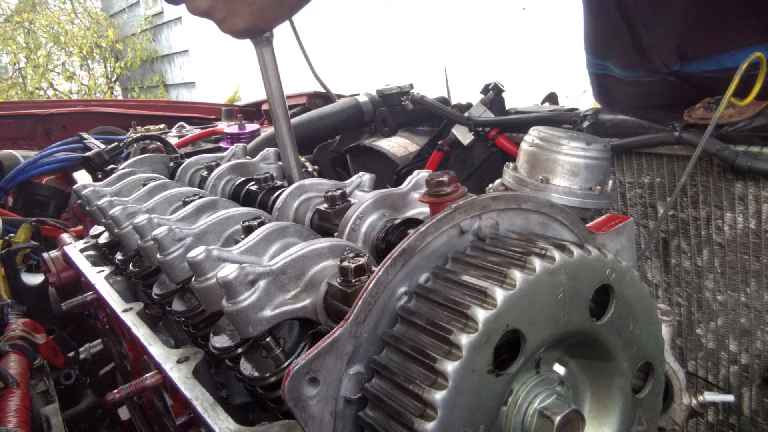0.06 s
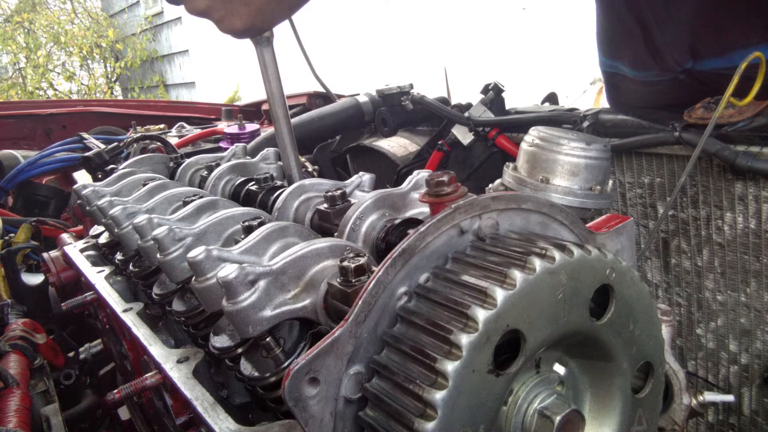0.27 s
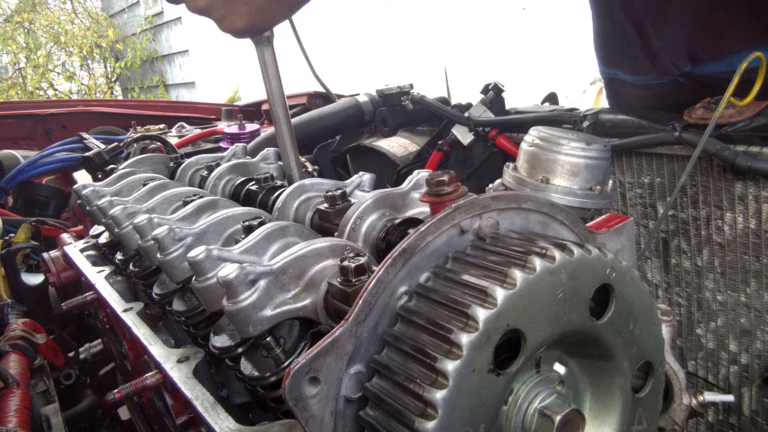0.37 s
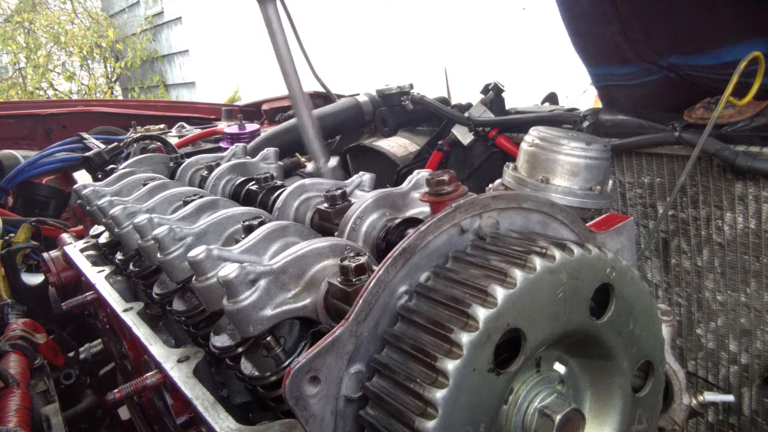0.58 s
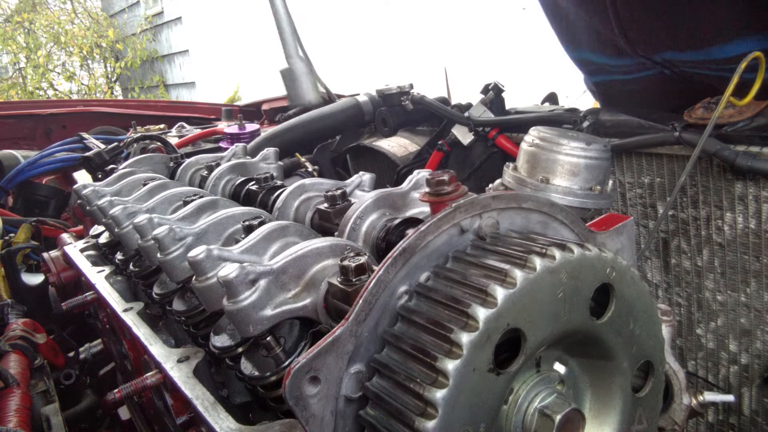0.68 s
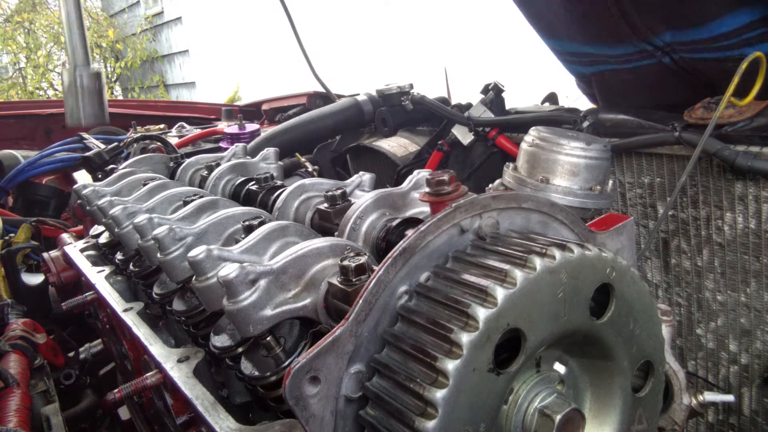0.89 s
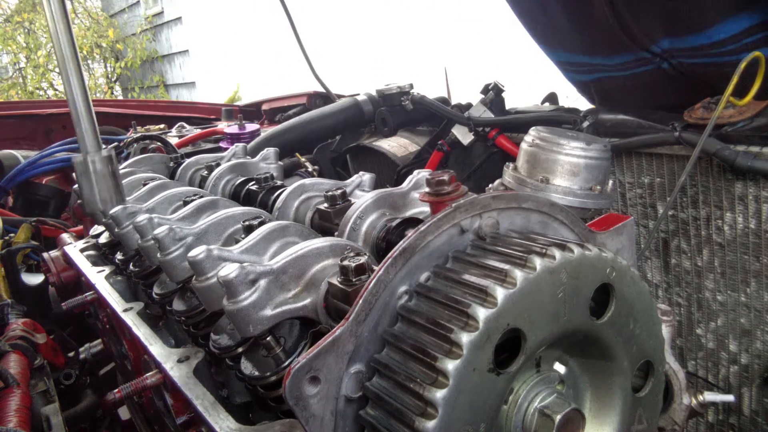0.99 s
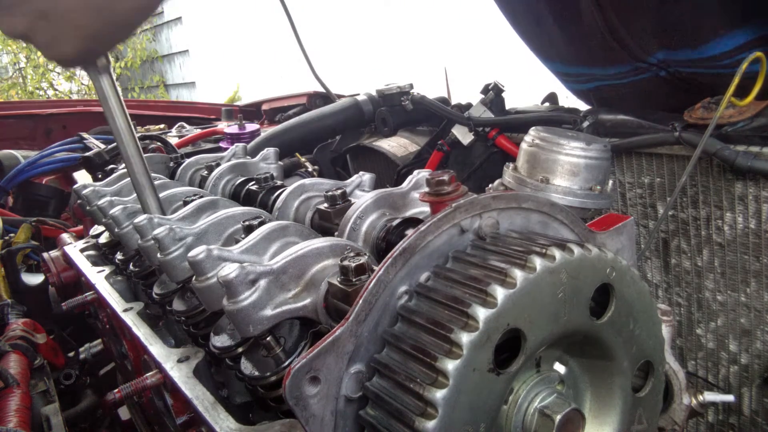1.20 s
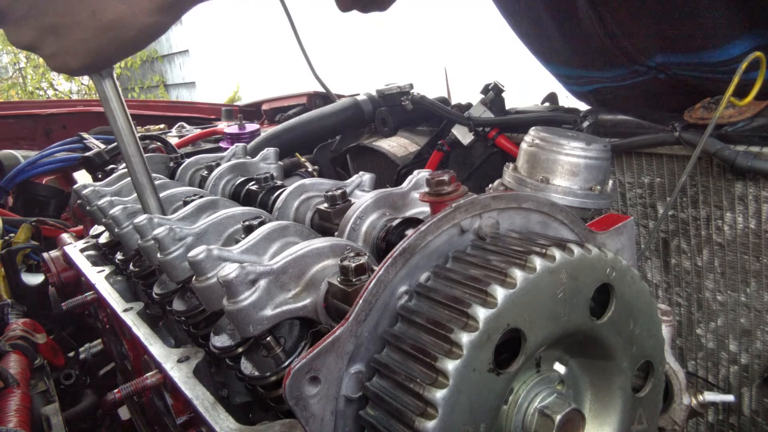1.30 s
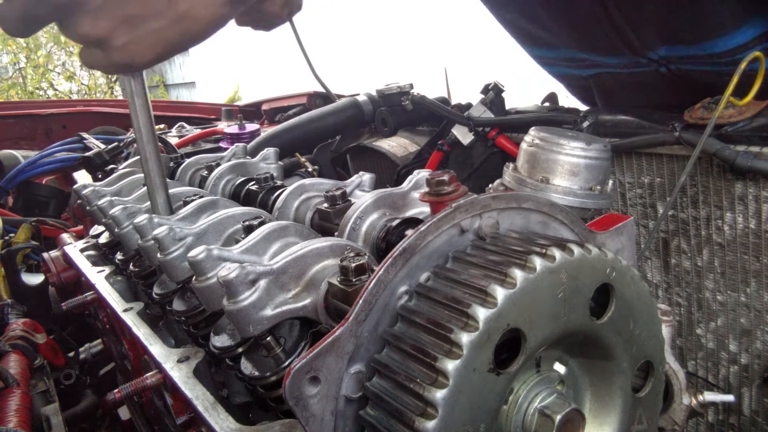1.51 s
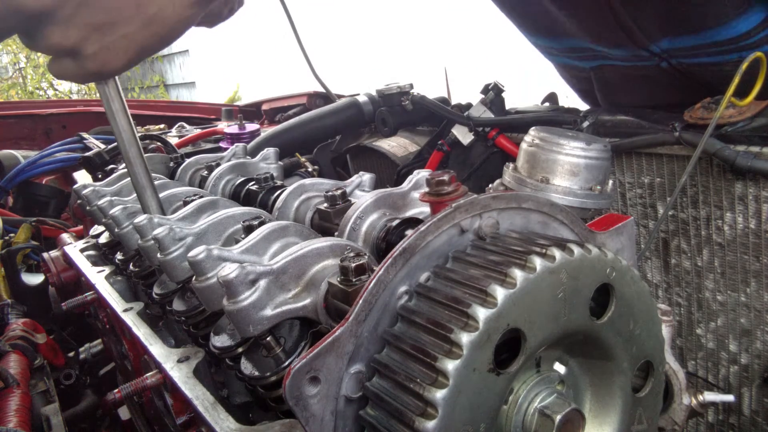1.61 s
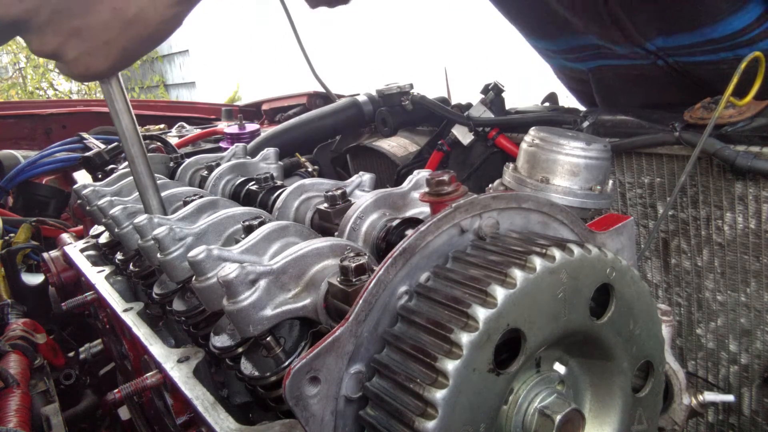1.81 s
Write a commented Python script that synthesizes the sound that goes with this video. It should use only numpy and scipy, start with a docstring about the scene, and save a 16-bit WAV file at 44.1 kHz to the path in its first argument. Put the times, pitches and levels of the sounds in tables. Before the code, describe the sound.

Sharp metallic crack of a socket wrench loosening a bolt, followed by light clinks and clicks.

```python
"""Socket wrench on an open engine

Close by, a socket on a long extension bar cracks one bolt loose, and the steel rings. The tool
knocks free, is lifted, rattles onto the next bolt and clicks as its slack is taken up. Soft low
bumps and a steady distant wash of noise lie underneath. The loud crack makes an automatic volume
control turn everything down, and the wash then creeps back."""
import sys
import numpy as np
from scipy import signal
from scipy.fft import rfft, irfft
from scipy.io import wavfile
from scipy.ndimage import uniform_filter1d

SR = 44100
rng = np.random.default_rng(int(sys.argv[2]) if len(sys.argv) > 2 else 0)


def master_out(mix):
    """Clip the mix to full scale and print it as 16-bit PCM to the path in sys.argv[1]."""
    frames = np.transpose(np.atleast_2d(mix))
    ceiling = np.clip(frames, -1, 1)
    pcm = np.round(ceiling * 32767).astype(np.int16)
    wavfile.write(sys.argv[1], SR, pcm)


N = 81585

# A "tone" table shapes a sound from bass to treble. A "fade" is the time to drop by 60 dB.
# the bolt breaking loose, and the bar's rebound (time [s], level [dB])
CRACKS = [(0.2139, -3), (0.2358, -25)]
# tone of the crack (frequency [Hz], level [dB])
CRACK_TONE = [(60, -8.5), (180, -0.5), (330, 4.5), (750, -1), (1150, -9), (1700, 0), (2600, 3.5),
              (3400, -4), (4400, 6), (5500, -5.5), (6600, 2.5), (8500, 1), (10300, -13), (15000, -12)]
# ring of the bar under load (pitch [Hz], level [dB], fade [s])
BAR_NOTES = [(1333, -26, .22), (1972, -11.5, 0.12), (2350, -5.5, 0.071), (2560, -17.5, 0.043),
             (2670, -11.5, .12), (3870, -13.5, 0.1213), (4400, -10.5, 0.16), (4513, -14, .13),
             (4680, -4, 0.09), (5967, -34, .08), (6480, -6.5, 0.054), (7510, -9.5, 0.062),
             (7874, -9.5, 0.11), (8900, -14, .08)]
# dull ring of the engine's cylinder head (pitch [Hz], level [dB], fade [s])
HEAD_NOTES = [(272, -17.5, 0.04), (383, -5.5, 0.13), (510, -14.5, 0.046), (688, -8.5, 0.067),
              (777, -6.5, 0.065), (975, -13, 0.039)]
# the tool knocking free (time [s], level [dB])
KNOCKS = [(0.4279, -14), (0.4313, -17.5)]
# tone of a knock (frequency [Hz], level [dB])
KNOCK_TONE = [(60, -13), (200, -5), (400, 4), (900, -1.5), (1700, 1.5), (3300, -1), (4800, 3), (6500, -3),
              (10500, -0.5), (12300, -17), (13100, -7), (15500, -19)]
# ring of the loose socket (pitch [Hz], level [dB], fade [s])
SOCKET_NOTES = [(371, -32, 0.21), (1423, -19, 0.35), (1688, -10, 0.12), (2350, -11, 0.14), (2560, -8, 0.11),
                (4200, -13.5, 0.14), (4600, -20, .1), (11500, -35, .4)]
# hard blows that feed the bar's long, faint note (time [s], level [dB])
SINGS = [(0.213, -50.5), (.428, -56), (1.254, -68)]
# socket meeting bolt (time [s], level [dB], dull above [Hz], extra note [Hz], note level [dB])
CLINKS = [(0.644, -50, 9000, 3170, -10), (0.669, -45, 4660, 4100, -2), (0.865, -47.5, 8800, 6430, -1),
          (.887, -56.5, 9000, 6500, -3), (1.144, -45, 3660, 2440, 9), (1.1804, -26.5, 7900, 4960, 2.5),
          (1.2019, -26.5, 6100, 3560, 1), (1.2362, -29.5, 10900, 1350, -8), (1.2417, -24.5, 8400, 2840, -1),
          (1.2539, -19, 9500, 1940, -10)]
# tone of a clink (frequency [Hz], level [dB])
CLINK_TONE = [(100, -8.5), (700, -8.5), (1350, -3.5), (2500, 1), (4000, -0.5), (6500, 1.5), (8500, -3.5),
              (11000, -8), (15500, -8)]
# ring of the socket on the bolt (pitch [Hz], level [dB], fade [s])
CLINK_NOTES = [(1320, -10.5, 0.095), (2577, -25, 0.053), (3970, -21, 0.064), (4950, -18, 0.075),
               (5080, -26, 0.073), (6400, -14, 0.056), (6920, -23.5, .16)]
# the socket landing on the cylinder head (time [s], level [dB])
THUDS = [(1.144, -36), (1.152, -39), (1.2135, -28.5), (1.223, -31.5), (1.594, -36), (1.605, -39.5)]
# tone of a thud (frequency [Hz], level [dB])
THUD_TONE = [(60, -30), (200, 4.5), (400, 8), (800, 2.5), (1200, -3), (2000, -7), (2900, -2), (4000, -13),
             (5200, -12), (7000, -32), (15000, -47)]
# loose joints closing (time [s], level [dB], dull above [Hz], extra note [Hz], note level [dB])
CLICKS = [(1.4956, -37, 9000, 6640, -2.5), (1.505, -26.5, 10900, 3310, -7), (1.5293, -44.5, 6500, 3220, -2),
          (1.5485, -38.5, 14000, 5140, 0.5), (1.5727, -27.5, 8900, 2464, -4), (1.5801, -34, 8140, 2230, -3),
          (1.596, -42, 5000, 2860, -10), (1.833, -56.5, 6000, 2110, 8.5)]
# tone of a click (frequency [Hz], level [dB])
CLICK_TONE = [(100, -24), (1000, -14.5), (1800, -8), (2400, 3), (3200, 0), (3800, -7), (5200, 1.5),
              (7200, -6), (8400, -4), (10200, -10.5), (11500, -5), (15500, -14)]
# ring of the tool's joints (pitch [Hz], level [dB], fade [s])
JOINT_NOTES = [(2100, -20, .08), (2520, -15, 0.027), (2420, -6.5, 0.063), (3220, -14, .09),
               (4983, -35, 0.074), (5000, -12, 0.11), (5400, -21, 0.055), (6000, -23, .07)]
# late echoes of a hit (frequency [Hz], level [dB], fade [s])
ECHO_TAIL = [(200, -13, .11), (1364, -3, 0.15), (3960, -4.5, .12), (9000, -14, 0.14), (15040, -10.5, 0.14)]
# soft low bumps (time [s], level [dB], pitch [Hz])
BUMPS = [(.580, -35, 102), (0.985, -31.5, 85), (1.0045, -23, 85.6), (1.027, -24, 85)]
# tone of the rumble (frequency [Hz], level [dB])
RUMBLE_TONE = [(15, -0.5), (40, 0.5), (80, -9.5), (150, -17.5), (400, -40.5), (2000, -80.5)]
# rise and fall of the rumble (time [s], level [dB])
RUMBLE_LEVELS = [(0, -74), (.44, -58), (.53, -46.5), (.76, -47), (.84, -70), (.98, -40), (1.09, -48),
                 (1.27, -67.5), (1.75, -62), (1.85, -51)]
# tone of the distant wash (frequency [Hz], level [dB])
WASH_TONE = [(20, -18), (45, -18.5), (110, -3.5), (160, -3.5), (280, -1.5), (500, -7), (650, -6),
             (780, -1.5), (970, -2), (1300, -7.5), (1900, -15), (2850, -26), (5000, -35), (15500, -43.5)]
# tone of the faint hiss (frequency [Hz], level [dB])
HISS_TONE = [(30, -8), (300, 5.5), (1000, 3), (3000, -3), (8000, -15.5), (15500, -22.5)]

RISE_S, EXTRA_NOTE_FADE_S = 0.0004, 0.05


def bolt_loosening():
    """The bolt lets go with a hard tick that shakes bar and engine; then the tool knocks free."""
    out = np.zeros(N)
    for s, db in CRACKS:
        crack = amp(-2.5) * hit(CRACK_TONE) + ring(BAR_NOTES) + amp(-8) * ring(HEAD_NOTES)
        tick = unit(pulse(CRACK_TONE, SR)[:64])
        add(out, s, amp(db) * crack)
        add(out, s, amp(db - 5) * tick)
    for s, db in KNOCKS:
        add(out, s, amp(db) * (amp(1) * hit(KNOCK_TONE) + ring(SOCKET_NOTES)))
    return out


def bar_singing(pitch_hz=4670, fade_s=1.6):
    """One slowly fading note of the bar gathers energy from the blows and outlasts them."""
    t = np.arange(N) / SR
    power = sum((t > s) * amp(db - 60 * abs(t - s) / fade_s) ** 2 for s, db in SINGS)
    return np.sqrt(power) * np.sin(2 * np.pi * pitch_hz * t)


def socket_seating():
    """The socket clinks over the next bolt and drops into place with dull thuds."""
    out = np.zeros(N)
    for s, db, dull_hz, note_hz, note_db in CLINKS:
        notes = CLINK_NOTES + [(note_hz, note_db, EXTRA_NOTE_FADE_S)]
        add(out, s, amp(db) * (amp(-2.5) * hit(CLINK_TONE, dull_hz) + ring(notes)))
    for s, db in THUDS:
        add(out, s, amp(db) * (amp(-4) * hit(THUD_TONE, rise_s=0.0025) + ring(HEAD_NOTES)))
    return out


def slack_clicks():
    """Handle, bar and socket click together; each contact brings out a note of its own."""
    out = np.zeros(N)
    for s, db, dull_hz, note_hz, note_db in CLICKS:
        notes = JOINT_NOTES + [(note_hz, note_db, EXTRA_NOTE_FADE_S)]
        add(out, s, amp(db) * (amp(-3.5) * hit(CLICK_TONE, dull_hz) + ring(notes)))
    return out


def hit(tone, dull_hz=SR, rise_s=RISE_S, size=12288):
    """The noise of one contact: a snap, packed echoes in the engine bay, then a short tail."""
    t = np.arange(size) / SR
    snap_s, echo_s, hold_s, fade_s = 0.0006, 0.0044, 0.0033, 0.035
    snap = amp(-2) * np.exp(-t / snap_s)
    nearest_echo = amp(-6.5) * np.exp(-((t - echo_s) / snap_s) ** 2)
    packed_echoes = amp(-60 * np.maximum(t - hold_s, 0) / fade_s)
    early_shape = (1 - np.exp(-t / rise_s)) * (packed_echoes + snap + nearest_echo)
    # in the tail, each band of noise fades at its own speed
    hz, age, bands = signal.stft(rng.standard_normal(size), SR, nperseg=128)
    tail_db = look_up(np.array(ECHO_TAIL)[:, :2], hz)[:, None]
    tail_fade_s = look_up(np.array(ECHO_TAIL)[:, ::2], hz)[:, None]
    bands *= amp(tail_db - 60 * age / tail_fade_s)
    late = signal.istft(bands, SR, nperseg=128)[1][:size] * np.minimum(t / hold_s, 1)
    early = early_shape * rng.choice([-1., 1.], size)
    return signal.fftconvolve(early + late, pulse(tone, dull_hz))[:size]


def ring(notes, grip_fade_s=0.048, size=12288):
    """Struck metal rings; hand and bolt quickly muffle most of it, leaving a weaker ring."""
    t = np.arange(size) / SR
    grip = amp(-7.5) + amp(-60 * t / grip_fade_s)
    waves = sum(amp(db - 60 * t / fade_s) * np.sin(2 * np.pi * (hz * t + rng.random()))
                for hz, db, fade_s in notes)
    return (1 - np.exp(-t / RISE_S)) * grip * waves


def pulse(tone, dull_hz, size=2048):
    """One sharp push with the given tone; softer contacts lose their treble."""
    hz = np.fft.rfftfreq(size, 1 / SR)
    spectrum = amp(look_up(tone, hz)) / np.sqrt(1 + (hz / dull_hz) ** 6)
    # keep the tone but move the energy to the very start (minimum phase)
    cepstrum = irfft(np.log(spectrum))
    cepstrum[1:size // 2] *= 2
    cepstrum[size // 2 + 1:] = 0
    push = irfft(np.exp(rfft(cepstrum)))
    return push / np.linalg.norm(push)


def low_bumps(width_s=0.0059):
    """Soft bumps, each a single low swing, over an uneven rumble."""
    t = np.arange(N) / SR
    swings = sum(amp(db) * np.exp(-((t - s) / width_s) ** 2) * np.sin(2 * np.pi * hz * (s - t))
                 for s, db, hz in BUMPS)
    rumble_db = np.interp(t, *np.transpose(RUMBLE_LEVELS))
    return swings + amp(rumble_db) * noise(RUMBLE_TONE)


def distant_wash(level_db=-50, drift_db=0.78):
    """Far-off outdoor noise whose tone drifts a little."""
    bands = signal.stft(noise(WASH_TONE), nperseg=1024, noverlap=768)[2]
    drift = uniform_filter1d(rng.standard_normal(bands.shape), size=8, axis=0)  # smooth over pitch
    drift = unit(uniform_filter1d(drift, size=6, axis=1))  # and over time
    wash = signal.istft(bands * amp(drift_db * drift), nperseg=1024, noverlap=768)[1][:N]
    return amp(level_db) * unit(wash)


def noise(tone):
    """Steady noise with the given tone."""
    gains = amp(look_up(tone, np.fft.rfftfreq(N, 1 / SR)))
    return unit(irfft(rfft(rng.standard_normal(N)) * gains, N))


def amp(db):
    """Turns decibels into a number to multiply by."""
    return 10 ** (np.asarray(db) / 20)


def unit(x):
    """Scales a signal to an average (rms) level of 1."""
    return x / np.sqrt(np.mean(x ** 2) + 1e-20)


def look_up(points, hz):
    """Reads between a table's rows, with octaves evenly spaced."""
    row_hz, value = np.transpose(points)
    return np.interp(np.log(hz + 1), np.log(row_hz), value)


def add(mix, start_s, sound):
    """Mixes a sound in at the given time."""
    part = mix[round(start_s * SR):][:len(sound)]
    part += sound[:len(part)]


def scene():
    """Tool, engine and surroundings, in one channel."""
    tool = bolt_loosening() + bar_singing() + socket_seating() + slack_clicks()
    return (tool + low_bumps() + distant_wash())[None]


def record(dry, limit_db=-20, hold_s=0.17, recover_db_per_s=11.5, top_hz=15750):
    """Loud sound turns the volume down; it waits, then creeps back. Adds hiss, cuts the top treble."""
    power_db = 10 * np.log10(abs(uniform_filter1d(dry[0] ** 2, size=256)) + 1e-12)
    over_db = np.maximum(power_db - limit_db, 0)
    recovery_db = recover_db_per_s * np.arange(N) / SR
    easing_db = np.maximum.accumulate(over_db + recovery_db) - recovery_db
    cut_db = np.minimum(np.maximum.accumulate(over_db), easing_db + recover_db_per_s * hold_s)
    out = dry * amp(-cut_db) + amp(-65) * noise(HISS_TONE)
    treble_cut = signal.firwin(255, top_hz, window=("kaiser", 9), fs=SR)
    return signal.oaconvolve(out, treble_cut[None], "same")


dry = scene()
out = record(dry)
master_out(out)
```